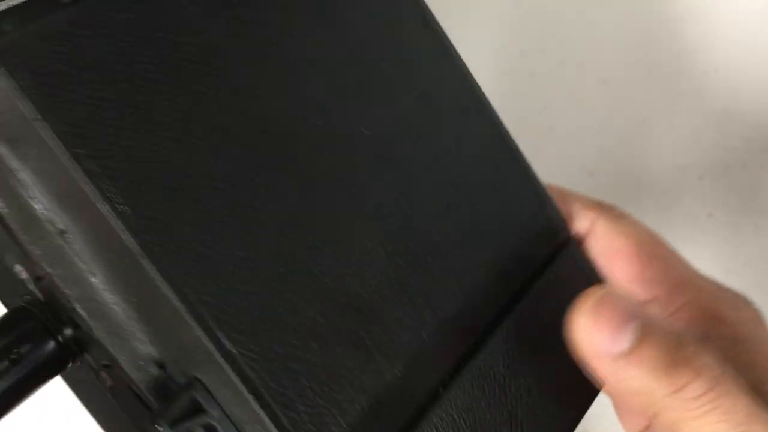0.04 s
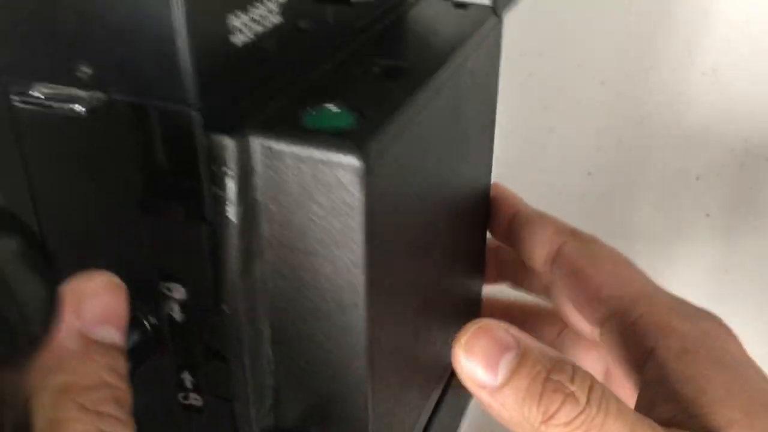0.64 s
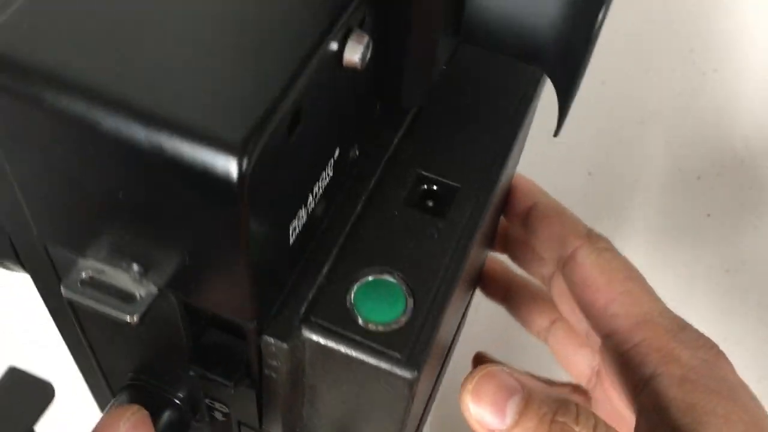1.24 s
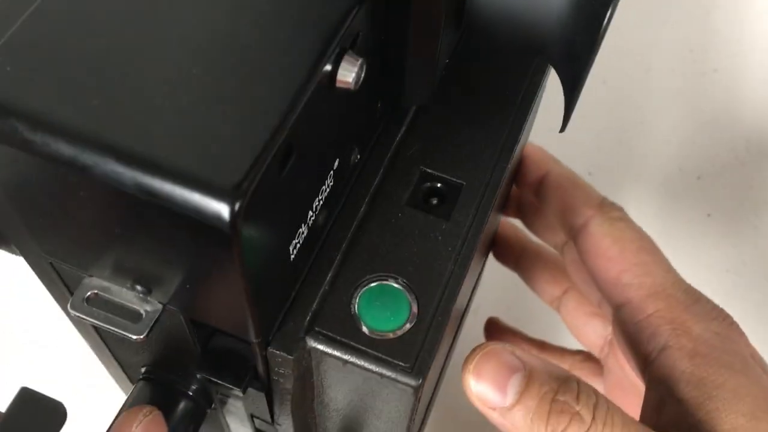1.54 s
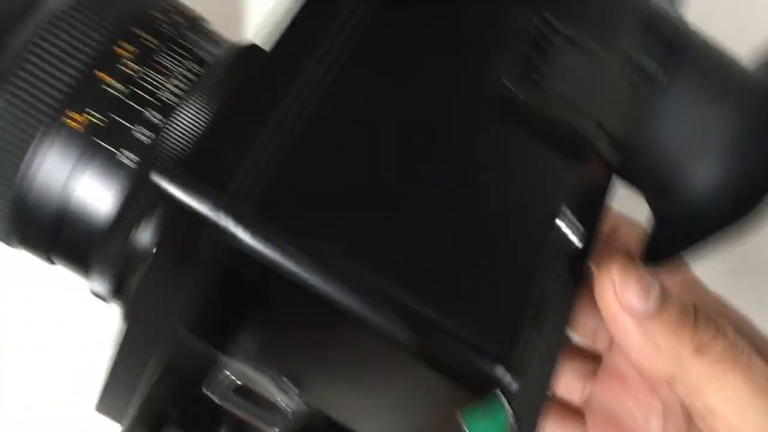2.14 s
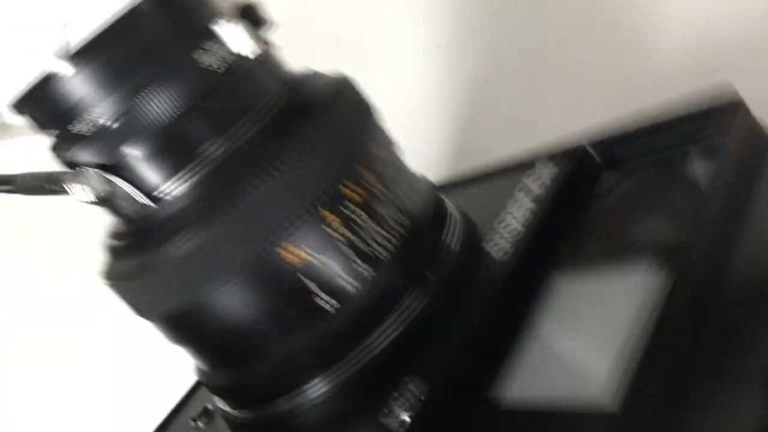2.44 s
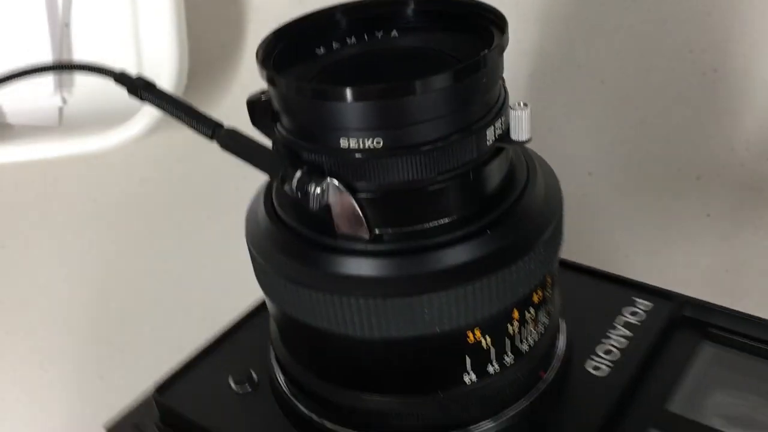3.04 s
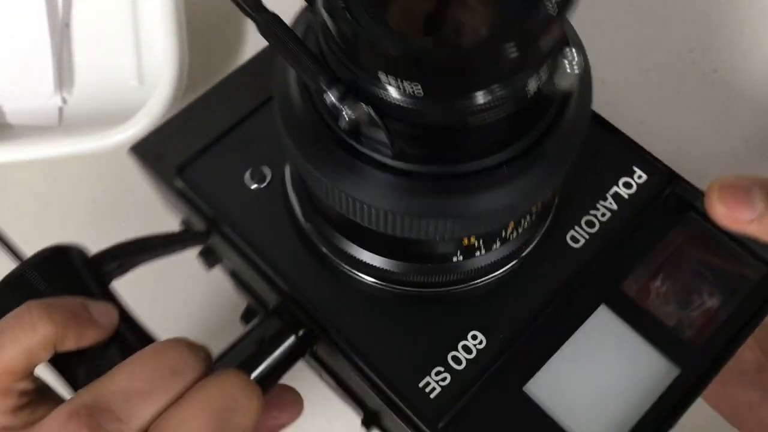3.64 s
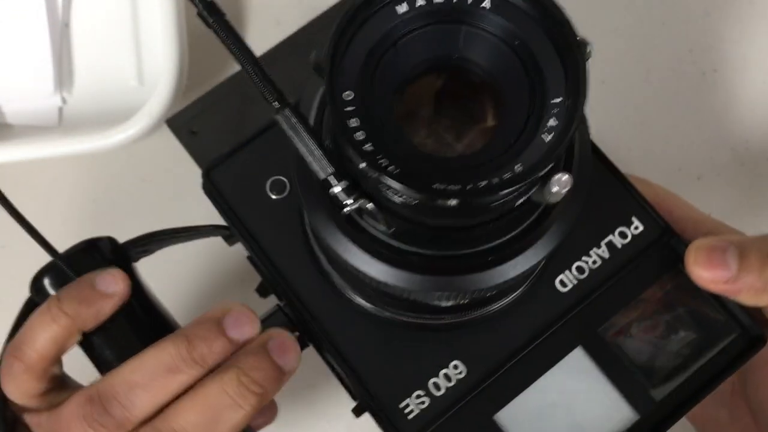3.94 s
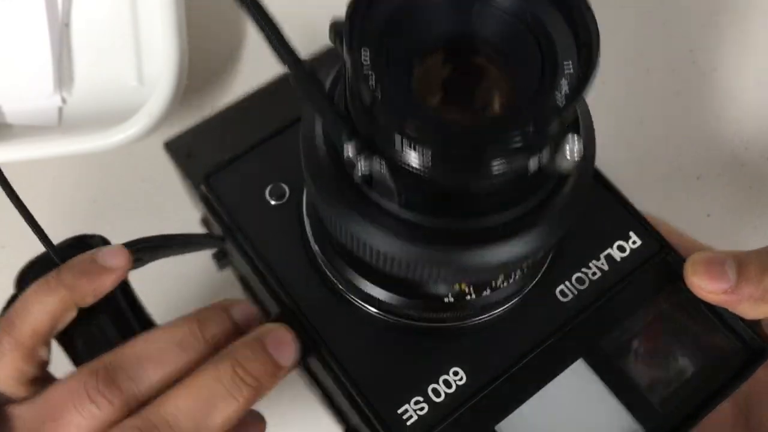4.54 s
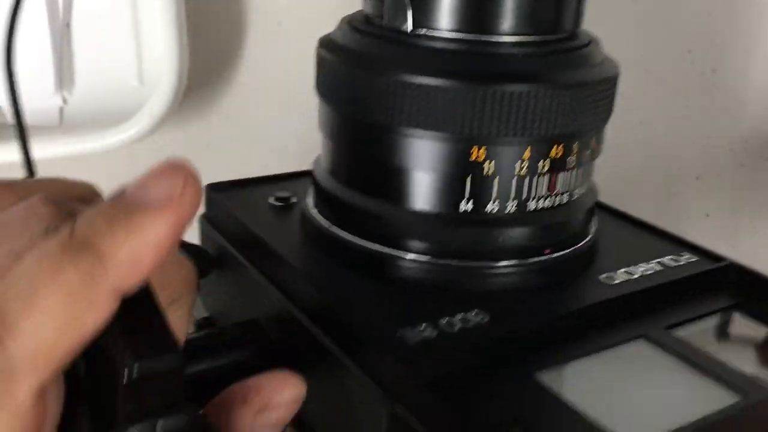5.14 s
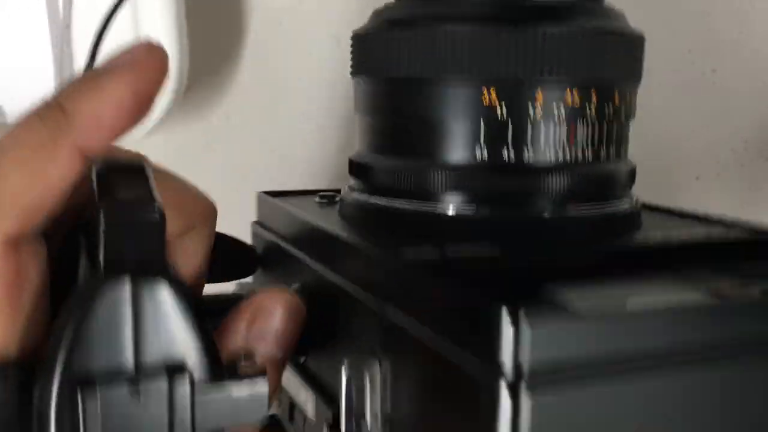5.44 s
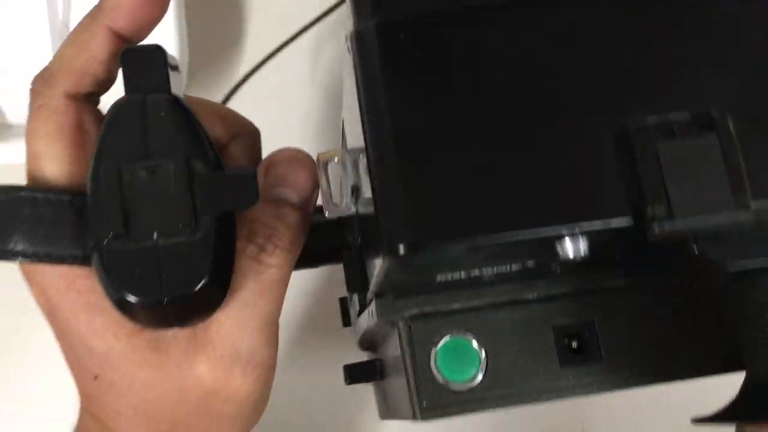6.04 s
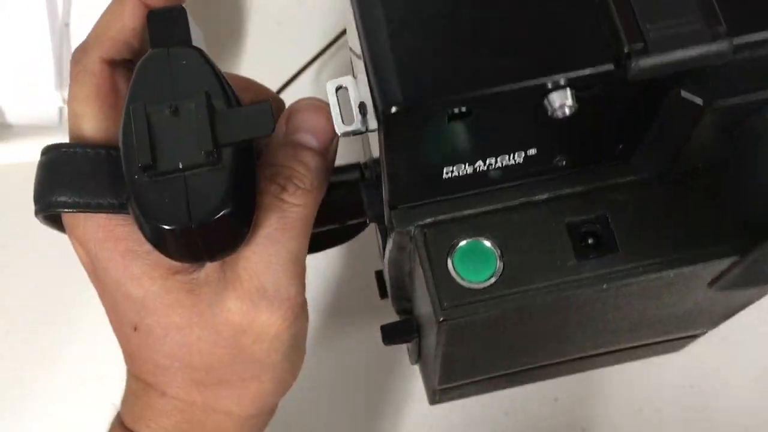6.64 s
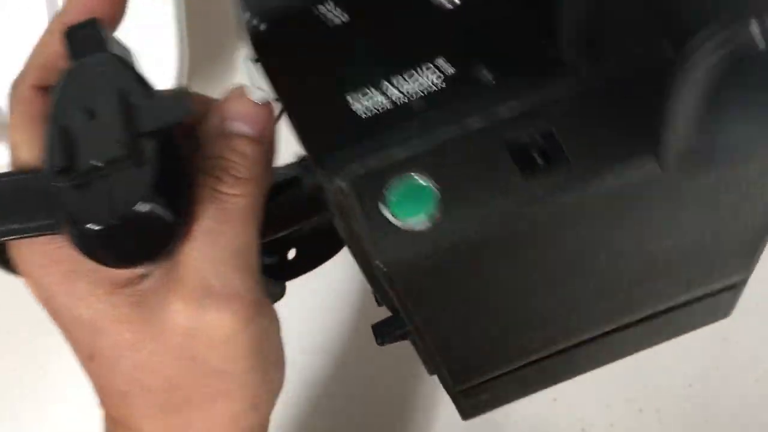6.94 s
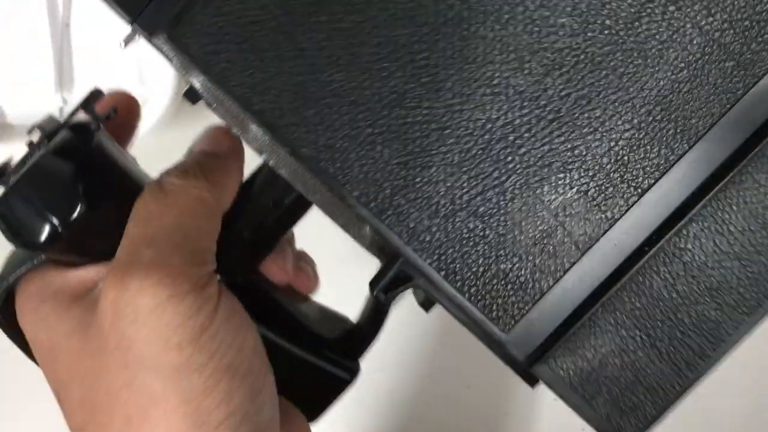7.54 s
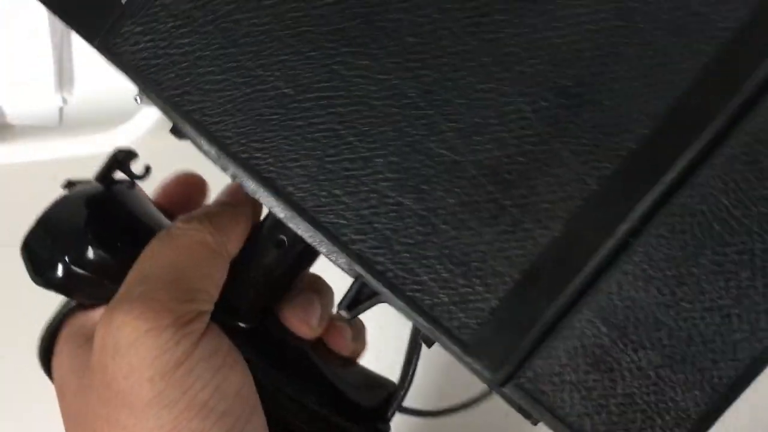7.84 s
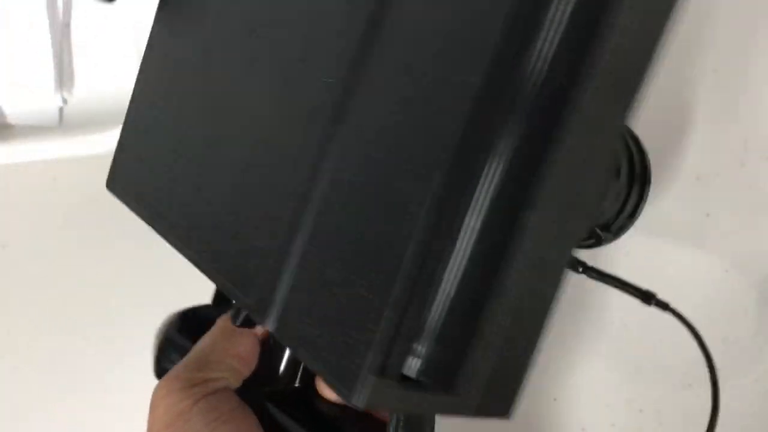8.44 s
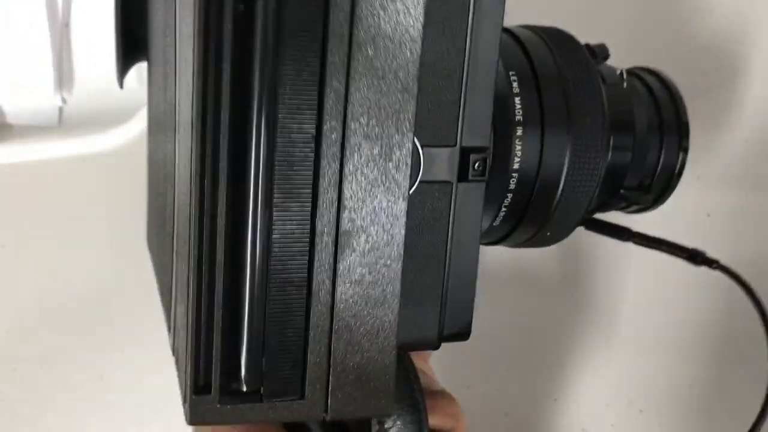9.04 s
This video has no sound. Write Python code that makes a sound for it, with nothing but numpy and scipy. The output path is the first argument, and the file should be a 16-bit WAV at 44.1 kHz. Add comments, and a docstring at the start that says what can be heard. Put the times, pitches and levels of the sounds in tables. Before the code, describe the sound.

Faint rubbing and scattered ticks come from fingers moving over a bulky camera's hollow plastic body, heard close up over quiet indoor rumble. A low hum rises and falls as the handling gets busier. A short shudder and a soft bump lead to dull thumps and a quick cluster of hard knocks. Metal fittings click now and then, and near the end the plastic crackles and creaks rapidly under the weight before settling.

```python
"""Skin rubs on plastic over a low room rumble: two hands turn a big press camera close to the microphone.
Friction drives the modes of its shell and hollow film back, the grip creaks by stick-slip under the weight,
fingertips tap, a low drone swells and small metal fittings click. Midway the body judders, bumps down
softly and takes several knocks, the last ones hard. One finger squeaks; near the end the creaks crowd in."""
import sys
import numpy as np
from scipy import signal
from scipy.fft import rfft, irfft, next_fast_len
from scipy.io import wavfile

SR = 44100
rng = np.random.default_rng(int(sys.argv[2]) if len(sys.argv) > 2 else 0)


def generate_wav(signal):
    """Clip the signal to [-1, 1] and save it as 16-bit WAV at the path in sys.argv[1]."""
    frames = np.transpose(np.atleast_2d(signal))
    scaled = np.clip(frames, -1, 1) * 32767
    pcm = np.round(scaled).astype(np.int16)
    wavfile.write(sys.argv[1], SR, pcm)


N = 409248
TIME = np.arange(N) / SR
RING_TIME = TIME[:SR // 4]


def amp(db):
    """Amplitude ratio of a level; all tabulated levels are relative."""
    return 10 ** (np.asarray(db) / 20)


def unit_rms(x):
    """Normalisation to rms 1."""
    return x / np.sqrt(np.mean(x ** 2))


def unit_energy(x):
    """Normalisation to energy 1."""
    return x / np.sqrt(np.sum(x ** 2))


def add(out, t, sound):
    """Superposition: mix a sound in at time t."""
    start = max(round(t * SR), 0)
    out[start:start + len(sound)] += sound[:N - start]


def decay(t60):
    """Exponential damping: 60 dB down after t60 seconds."""
    return np.exp(-np.log(1000) * RING_TIME / t60)


def colour(x, spectrum):
    """Spectral shaping by (f, level) points, falling 10 dB per octave past the ends; rms 1."""
    hz, db = np.transpose(spectrum)
    octave = np.log2(np.maximum(np.fft.rfftfreq(len(x), 1 / SR), 1))
    outside = np.abs(octave - np.clip(octave, np.log2(hz[0]), np.log2(hz[-1])))
    gain = amp(np.interp(octave, np.log2(hz), db) - 10 * outside)
    return unit_rms(irfft(rfft(x) * gain, len(x)))


def band(x, hz, width):
    """Band-pass resonance with its geometric centre at hz; rms 1."""
    low = np.hypot(hz, width / 2) - width / 2
    return unit_rms(signal.sosfilt(signal.butter(2, [low, low + width], "band", fs=SR, output="sos"), x))


def ring(modes, vary_db=4):
    """Free vibration: damped modes whose strengths vary with the point of impact."""
    hz, db, t60 = np.transpose(modes)[:, :, None]
    strength = amp(db + vary_db * rng.standard_normal((len(modes), 1)))
    sign = (-1) ** np.arange(len(modes))[:, None]
    return np.sum(sign * strength * decay(t60) * np.sin(2 * np.pi * hz * RING_TIME), axis=0)


def burst(spectrum, t60, rise=0.00024, lumpy_db=0):
    """Modal overlap: dense modes merge into decaying noise, gritty if lumpy; energy 1."""
    envelope = decay(t60) * (1 - np.exp(-RING_TIME / rise))
    white, lumps = rng.standard_normal((2, len(RING_TIME)))
    return unit_energy(colour(white * amp(lumpy_db * lumps), spectrum) * envelope)


def forced(drive, response):
    """Forced vibration: the drive convolved with an impulse response; rms 1."""
    return unit_rms(signal.fftconvolve(drive, response)[:len(drive)])


# contour that the rumble partly follows: t/s, level/dB
RUMBLE_CONTOUR = [(0.2, -63.5), (0.64, -68.5), (4.34, -63.5), (4.51, -67), (7.21, -66), (9.0, -67)]
# spectra of the room's rumble and hiss: f/Hz, level/dB
RUMBLE_SPECTRUM = [(22, -21), (41, -12.5), (65, 5), (79, -6), (93, 1), (117, -6), (170, -3), (207, -17.5),
                   (273, -16), (400, -22), (481, -30.5), (600, -30)]
AIR_SPECTRUM = [(290, -29), (510, -7.5), (640, -15.5), (1200, -17.5), (2900, -21.5), (6640, -25.5),
                (15800, -29)]
def room_noise(rumble_db=-58, swing_share=0.7, air_db=-76):
    """Ambient noise: a slowly wavering rumble and a faint steady hiss."""
    contour = np.interp(TIME, *np.transpose(RUMBLE_CONTOUR))
    swing_db = swing_share * (contour - contour.mean())
    rumble = amp(rumble_db + swing_db) * colour(rng.standard_normal(N), RUMBLE_SPECTRUM)
    return rumble + amp(air_db) * colour(rng.standard_normal(N), AIR_SPECTRUM)


# modes of the shell walls and of the hollow film back: f/Hz, level/dB, t60/s
WALL_MODES = [(765, 0, .065), (885, -2, .065), (1050, .5, .055), (1160, -4.5, .04), (1280, 2.5, .055),
              (1420, -4, .04), (1940, -7, .028), (2330, -10, .025)]
HOLLOW_MODES = [(165.3, 4.5, 0.22), (209, 1, 0.11), (256, -3, 0.09), (369, -3.5, 0.078), (394, -4.5, 0.064),
                (571, -10.5, 0.045)]
# spectra of the plastic's clack, the casing's response and the skin's hiss: f/Hz, level/dB
CLACK_SPECTRUM = [(480, 3), (750, 4), (1300, -7.5), (2400, 3), (2800, -2.5), (3300, 2), (4000, -3),
                  (5200, -13.5)]
CASING_SPECTRUM = [(120, 0), (1650, 0.5), (2480, 1), (2850, -3.5), (3500, 0.5), (15800, -4)]
HISS_SPECTRUM = [(2900, -15), (3550, -7.5), (4200, -5), (4950, -11.5), (5900, -4.5), (7100, -8.5),
                 (7900, -12.5), (9300, -8), (10400, -17.5), (11500, -12.5), (15800, -19.5)]
# strokes of skin: fastest at t/s, length/s, level/dB, grip (0-1), rasp f/Hz, hiss re stroke/dB
SKIN_STROKES = [(0.187, 1.06, -75.5, 0.59, 840, -6), (2.178, 0.46, -70, 0.65, 1200, -8),
                (2.467, 0.28, -61.5, 0.36, 1930, -5), (2.487, 0.36, -69, 0.1, 447, -6),
                (2.681, 0.4, -75.5, 0.45, 2096, 0), (2.821, 0.12, -63.5, 0.57, 2170, -1.5),
                (3.235, 0.15, -68, 0, 430, 0), (3.049, 0.24, -68.5, .05, 2330, 3),
                (3.109, 0.18, -73, 0.3, 2210, 14.5), (3.248, 0.35, -67, 0.17, 2090, 0.5),
                (3.35, 1.1, -71, 0.1, 340, -10), (3.466, 0.21, -63, 0.55, 1260, -15),
                (3.641, 0.18, -67, 0.36, 2170, -14), (4.271, 0.28, -70.5, 0.5, 675, -12),
                (4.585, 0.25, -70.5, 0.03, 2110, -5.5), (5.015, 0.047, -71.5, 0.24, 2700, -3),
                (5.316, 0.1, -66.5, 0.1, 2300, -2), (5.423, 0.15, -71.5, 0.73, 2160, -3),
                (5.534, 0.13, -66.5, 0.47, 1800, -3.5), (6.332, 0.17, -74, 0.39, 2100, -5.5),
                (8.853, 1.73, -89.5, 0.78, 1690, 8.5)]
def rubbing(glide_per_s=5500, grip_per_s=240, rise_share=0.43):
    """Sliding friction: one stream of tiny catches drives walls, hollow, rasp and hiss."""
    out = np.zeros(N)
    walls, hollow = ring(WALL_MODES, vary_db=0), ring(HOLLOW_MODES, vary_db=0)
    for peak, length, db, grip, hz, hiss_db in SKIN_STROKES:
        start = peak - rise_share * length
        now = (TIME > start) & (TIME < start + length)
        ramp = np.interp(TIME[now], [start, peak, start + length], [0, 1, 0])
        speed = np.sin(np.pi / 2 * ramp) ** 1.26
        # gripping skin catches seldom and shakes the shell; gliding skin catches often and rasps
        per_s = glide_per_s * (grip_per_s / glide_per_s) ** grip
        shake_db = np.interp(grip, [0, 1], [-5, 4.5])
        catches = skin_catches(per_s)
        drive = catches + amp(-12) * rng.standard_normal(len(catches))
        drive = drive[:next_fast_len(len(speed), True)]
        shell = forced(drive, walls) + amp(-5) * forced(drive, hollow)
        grit = amp(-7) * colour(drive, CLACK_SPECTRUM)
        rasp = colour(band(drive, hz, width=0.59 * hz) + grit, CASING_SPECTRUM)
        hiss = colour(drive, HISS_SPECTRUM)
        sound = amp(shake_db) * shell + amp(-shake_db) * rasp + amp(hiss_db) * hiss
        out[now] += amp(db) * speed * np.resize(sound, len(speed))
    return out


def skin_catches(per_s, count=1 << 16, spread_db=3.8, clump_db=2.8):
    """Shot noise: skin catches on pebbled plastic in random impulses, their sizes clumped; rms 1."""
    knots = TIME[:count:SR // 140]
    clumps = np.interp(TIME[:count], knots, rng.standard_normal(len(knots)))
    sizes = amp(spread_db * np.minimum(rng.exponential(1, count), 3) + clump_db * clumps)
    return unit_rms(sizes * rng.choice([-1, 1], count) * (rng.random(count) < per_s / SR))


# modes of a stiff edge and of a thin rib of the grip: f/Hz, level/dB, t60/s
EDGE_MODES = [(1604, 19, 0.011), (1966, 10.5, 0.014), (3220, -8, 0.0061)]
RIB_MODES = [(5590, 0, 0.021), (6380, -2, 0.021)]
# spectrum of a crack at the surface: f/Hz, level/dB
CRACK_SPECTRUM = [(600, 7.5), (1400, 8.5), (2800, 3), (4800, 5), (5900, 4), (7600, 3), (9200, 3.5),
                  (10400, -4.5), (11500, -0.5), (15800, -8)]
# timbre as the load shifts: t/s, crack tilt/(dB/octave), edge pitch ratio, wall f/Hz, wall/dB, rib/dB
LOAD_TIMBRE = [(2.2, -1.5, 1, 1130, 27.5, 8), (7.2, -2, 1.154, 990, 26.5, 19.5),
               (7.5, 0.5, 0.98, 990, 26, 11), (7.75, 0, 1, 1040, 23.5, 8), (8.4, 1.3, 0.99, 1200, 23, 8)]
# single slips: t/s, snap level/dB, crack level/dB, shell level/dB
SINGLE_SLIPS = [(0.122, -69, -58, -69), (0.369, -66, -63.5, -72), (0.475, -76, -61.5, -78),
                (0.496, -75, -64, -74), (1.1661, -76, -66, -72), (1.3132, -59, -63, -72),
                (1.526, -78, -66.5, -78), (2.081, -63, -61.5, -62.5), (2.151, -64, -64, -63),
                (2.182, -69, -62, -58.5), (2.2103, -65, -53.5, -73), (2.268, -60, -57, -62),
                (2.291, -61, -57.5, -58.5), (2.313, -58, -61, -57), (2.347, -55, -68, -61),
                (2.431, -46, -66, -68), (2.482, -58, -56, -59), (2.5378, -61, -78, -57.5),
                (2.8111, -49.5, -60, -59), (3.1195, -49, -54.5, -61.5), (4.9905, -56, -76, -65),
                (4.999, -60, -72, -65), (5.2105, -64, -68, -65.5), (6.4122, -87, -68, -102),
                (7.107, -54, -63, -67), (7.129, -52, -60, -62.5), (7.14, -58, -65, -61),
                (7.151, -59, -67, -65), (7.18, -50, -58.5, -60.5), (7.19, -59, -76, -62.5),
                (7.213, -50, -61, -61), (7.248, -51, -61, -62.5), (7.263, -60, -63, -65),
                (7.294, -52, -61, -63.5), (7.32, -52, -59.5, -60), (7.3495, -47, -60, -58),
                (7.363, -54, -56, -54), (7.407, -47.5, -60.5, -58.5), (7.432, -46, -59, -61),
                (7.5682, -44, -60.5, -68), (7.5958, -47, -64, -62), (7.6696, -44, -62, -78),
                (7.765, -44, -61.5, -80), (7.7763, -42, -56.5, -51.5), (7.8238, -41.5, -59, -65),
                (7.833, -45, -58.5, -53), (7.842, -52, -71, -54.5), (7.9075, -47, -60.5, -68),
                (7.9729, -45.5, -58, -63), (8.0013, -46, -60, -72), (8.011, -45, -58.5, -53.5),
                (8.0635, -45.5, -61.5, -67), (8.08, -56, -63.5, -77), (8.1096, -52, -62, -78),
                (8.1185, -47, -60.5, -56), (8.1695, -51, -56.5, -55.5), (8.2248, -47.5, -61.5, -60.5),
                (8.2802, -54, -63, -72), (8.3328, -52, -61, -76), (8.3745, -48, -54, -60),
                (8.4238, -62, -61, -78), (8.4339, -51, -60, -56.5), (8.485, -67, -67, -80),
                (8.5015, -48.5, -59.5, -56.5), (8.5858, -48.5, -63, -55.5), (8.6281, -46, -60.5, -56.5),
                (8.9379, -67, -62, -67.5), (9.043, -68, -63.5, -68)]
def creaks(pivot_hz=5000, settle_s=0.022, gritty_db=7):
    """Stick-slip: each release cracks, snaps an edge, pings a rib and shakes the shell."""
    out = np.zeros(N)
    hz, db = np.transpose(CRACK_SPECTRUM)
    times, *controls = np.transpose(LOAD_TIMBRE)
    for t, snap_db, crack_db, shell_db in list(SINGLE_SLIPS) + slip_runs():
        tilt, pitch, focus_hz, wall_db, rib_db = (np.interp(t, times, c) for c in controls)
        spectrum = np.transpose([hz, db + tilt * np.log2(hz / pivot_hz)])
        snap = amp(14) * unit_energy(ring(np.array(EDGE_MODES) * [pitch, 1, 1]))
        crack = amp(23) * burst(spectrum, t60=0.019, rise=0.00045, lumpy_db=gritty_db)
        rib = amp(rib_db) * unit_energy(ring(RIB_MODES))
        clack = amp(19) * burst(CLACK_SPECTRUM, t60=0.036, rise=0.00068)
        hollow = amp(32) * unit_energy(ring(HOLLOW_MODES))
        walls = amp(wall_db) * wall_ring(focus_hz, falloff_db=22)
        add(out, t, amp(snap_db) * snap + amp(crack_db) * (crack + rib) + amp(shell_db) * clack)
        add(out, t + 0.001864, amp(shell_db) * (walls + hollow))
        for late in rng.random(size=2):  # the plastic catches twice more as it settles
            catch = burst(spectrum, t60=0.016, lumpy_db=gritty_db) + unit_energy(ring(EDGE_MODES))
            add(out, t + late * settle_s, amp(shell_db + 10) * (1 - late / 2) * catch)
    return out


def wall_ring(focus_hz, falloff_db, vary_db=4):
    """Mode selection: the point of contact favours wall modes near one pitch and sets their signs."""
    hz, db, t60 = np.transpose(WALL_MODES)[:, :, None]
    chance, side = rng.standard_normal((2, len(WALL_MODES), 1))
    strength = np.sign(side) * amp(db + vary_db * chance - falloff_db * np.log2(hz / focus_hz) ** 2)
    return unit_energy(np.sum(strength * decay(t60) * np.sin(2 * np.pi * hz * RING_TIME), axis=0))


# runs of slips: start t/s, end t/s, rate/Hz, snap level/dB, crack level/dB, shell level/dB
SLIP_RUNS = [(0.15, 0.74, 24, -76, -69.5, -74), (7.058, 7.1, 87, -68, -67.5, -69.5),
             (5.045, 5.075, 141, -65, -71, -67), (5.102, 5.18, 126, -64, -67.5, -67),
             (7.437, 7.489, 135, -49, -61.5, -57)]
def slip_runs(jitter_share=0.12):
    """Relaxation oscillation: steady load lets go at nearly even gaps; rows as in SINGLE_SLIPS."""
    rows = []
    for start, end, per_s, *levels in SLIP_RUNS:
        times = np.arange(start + 0.5 / per_s, end, 1 / per_s)
        for t, (late, scatter_db) in zip(times, rng.standard_normal((40, 2))):
            rows.append((t + jitter_share * late / per_s, *(np.array(levels) + scatter_db)))
    return rows


# fingertips landing on the shell: t/s, level/dB, wall f/Hz
FINGER_TAPS = [(0.189, -63, 1000), (0.678, -66.5, 990), (0.755, -63.5, 900), (0.9158, -66, 940),
               (1, -64.5, 940), (1.183, -66, 1290), (1.3135, -57, 1080), (2.338, -56, 1200),
               (2.988, -58, 1320), (3.121, -50.5, 1070), (3.555, -61.5, 1160), (6.705, -71, 1350),
               (7.534, -58.5, 880)]
def taps():
    """Impact excitation: a fingertip lands with a dry tick and a clack, and the wall under it rings."""
    out = np.zeros(N)
    for t, db, hz in FINGER_TAPS:
        tick = amp(14.5) * burst(CRACK_SPECTRUM, t60=0.012)
        wall = amp(24.5) * wall_ring(hz, falloff_db=12)
        clack = amp(20) * burst(CLACK_SPECTRUM, t60=0.04)
        add(out, t, amp(db) * (tick + wall + clack))
    return out


# course of the low drone: t/s, f/Hz, level/dB
DRONE_COURSE = [(1.42, 97, -58), (1.55, 95, -53.5), (1.8, 93, -51), (2.201, 96, -57), (2.75, 98, -61.5),
                (3.099, 101, -55.5), (3.65, 105, -52), (4.249, 110, -55), (4.5, 108, -52.5)]
def drone(gain_db=-2, fade_s=0.022):
    """Slow modulation: a low pure tone swells twice and creeps up in pitch."""
    t, hz, db = np.transpose(DRONE_COURSE)
    tone = unit_rms(np.sin(2 * np.pi * np.cumsum(np.interp(TIME, t, hz)) / SR))
    gate = np.interp(TIME, [t[0] - fade_s, t[0], t[-1], t[-1] + fade_s], [0, 1, 1, 0])
    return amp(np.interp(TIME, t, db) + gain_db) * gate * tone


# modes of a metal fitting: ratio to its nominal frequency, level/dB, t60/s
FITTING_MODES = [(.55, -9, .022), (.78, -8, .012), (.98, -1, .019), (1.06, 0, .015), (1.19, -4, .012),
                 (1.77, -7, .016)]
# fittings touching: t/s, level/dB, nominal f/Hz
FITTING_CLICKS = [(2.811, -60, 4600), (3.323, -61, 4860), (3.5217, -64.5, 4000), (3.636, -50.5, 4220),
                  (5.093, -50, 3020), (6.5336, -47, 3220), (7.9083, -59.5, 3780), (8.2145, -50.5, 3410),
                  (8.3742, -56, 3150), (8.434, -54, 3290), (8.502, -58, 3160)]
def fittings(gain_db=23):
    """Inharmonic ringing: small metal parts tick and ring briefly, damped by the hand."""
    out = np.zeros(N)
    for t, db, hz in FITTING_CLICKS:
        tone = unit_energy(ring(np.array(FITTING_MODES) * [hz, 1, 1]))
        tick = amp(-11) * burst(CRACK_SPECTRUM, t60=0.02, rise=0.001)
        add(out, t, amp(db + gain_db) * (tone + tick))
    return out


# spectrum of the skidding body: f/Hz, level/dB
SKID_SPECTRUM = [(200, 7), (600, -7), (760, -1), (1000, -10.5), (1290, 4.5), (1600, -13.5), (2150, -9.5),
                 (2700, -25.5), (3400, -16.5), (4800, -23), (6300, -24.5), (15800, -35)]
# jerks of growing strength: t/s, length/s, level/dB
SKID_JERKS = [(3.739, .008, -55), (3.749, 0.021, -51), (3.768, 0.019, -48.5), (3.787, 0.021, -50),
              (3.81, 0.016, -48), (3.829, 0.019, -46), (3.846, 0.013, -43), (3.863, 0.0097, -44)]
def judder():
    """Stick-slip of the whole body: each jerk is a short noisy skid that stops dead."""
    out = np.zeros(N)
    for t, length, db in SKID_JERKS:
        swell = np.sin(np.pi * RING_TIME[RING_TIME < length] / length)
        skid = colour(rng.standard_normal(len(RING_TIME)), SKID_SPECTRUM)[:len(swell)]
        add(out, t, amp(db) * swell * unit_rms(skid))
    return out


def bump(t=3.746, bounce_hz=111, swell_s=0.0075):
    """Damped mass and spring: the body bounces on a soft contact, its back flexes, the hollow rings."""
    out = np.zeros(N)
    swell = RING_TIME / swell_s * np.exp(1 - RING_TIME / swell_s)
    bounce = -amp(-22.5) * swell * np.sin(2 * np.pi * bounce_hz * RING_TIME)
    flex = amp(-28) * np.minimum(RING_TIME / 0.002, 1) * ring([(205, 0, 0.075)], vary_db=0)
    hollow = amp(-21) * unit_energy(ring(HOLLOW_MODES))
    add(out, t, bounce + flex + hollow)
    return out


# modes of the whole camera body: f/Hz, level/dB, t60/s
BODY_MODES = [(42, -11, .12), (62, -11, 0.14), (100.4, 5, 0.058), (169, -2.5, 0.083), (257.7, 3.5, 0.098),
              (347, 1, 0.068), (536, -5.5, 0.053), (870, -4, 0.036), (984, 0, 0.03), (1450, -14, 0.036),
              (1680, -17, 0.046), (2070, -11, 0.068), (1950, -8, 0.043), (2240, -6, 0.04), (2420, 3, 0.029),
              (3270, -17, 0.05)]
# spectrum of its loose parts: f/Hz, level/dB
RATTLE_SPECTRUM = [(150, -2), (400, 2), (560, -10), (1000, -4.5), (1450, -9.5), (2350, -2), (2900, -17),
                   (6500, -22), (15800, -34)]
# blows on the body: t/s, level/dB, contact time/s
BODY_BLOWS = [(4.015, -26, 0.023), (4.11, -45, 0.0067), (4.212, -36.5, 0.008), (4.474, -43, 0.0089),
              (4.684, -36.5, 0.00012), (4.695, -30.5, 0.0013), (4.6984, -47.5, 0.00014),
              (4.709, -35.5, 0.002)]
def knocks():
    """Contact time limits bandwidth: soft blows wake the low modes, hard ones all modes and a rattle."""
    out = np.zeros(N)
    for t, db, contact_s in BODY_BLOWS:
        force = RING_TIME / contact_s * np.exp(-2 * np.pi * RING_TIME / contact_s)
        rattle = amp(25) * burst(RATTLE_SPECTRUM, t60=0.045, rise=0.0003)
        response = ring(BODY_MODES, vary_db=1.5) + rattle
        add(out, t, amp(db) * signal.fftconvolve(response, force / force.sum()))
    return out


# resonances of a finger squeaking on the shell: f/Hz, level/dB, t60/s
SQUEAK_MODES = [(1276, -4, 0.04), (1935, 0, .055), (4300, -6, 0.024), (9220, -11, .012)]
def squeak(t=5.485, length_s=0.085, level_db=-65.5):
    """Resonance: a fingertip's fast, fine catches drive narrow modes that ring on as it lifts."""
    out = np.zeros(N)
    speed = np.sqrt(RING_TIME / length_s) * (RING_TIME < length_s)
    friction = speed * rng.standard_normal(len(RING_TIME))
    add(out, t, amp(level_db) * forced(friction, ring(SQUEAK_MODES, vary_db=0)))
    return out


def room(x, wet_db=-12, t60=0.14, delay_s=0.006):
    """Early reflections: the table and near walls return a dense, faint tail."""
    tail = burst([(100, -1), (500, 1), (1200, 1), (3000, 0), (8000, 0.5), (16000, -6.5)], t60)
    echoes = np.zeros(N)
    add(echoes, delay_s, signal.oaconvolve(x, tail)[:N])
    return x + amp(wet_db) * echoes


def scene():
    """Superposition of the background, the handling sounds and their reflections, in mono."""
    background = room_noise() + drone()
    handling = rubbing() + squeak() + fittings() + bump() + judder() + knocks() + taps() + creaks()
    return (background + room(handling))[None]


def record(dry, low_hz=33, high_hz=15900):
    """Band limiting: the small microphone loses the deepest bass, and the top is cut steeply."""
    thinned = signal.sosfilt(signal.butter(3, low_hz, "high", fs=SR, output="sos"), dry)
    return signal.sosfilt(signal.ellip(12, 0.1, 80, high_hz, fs=SR, output="sos"), thinned)


dry = scene()
out = record(dry)
generate_wav(out)
```